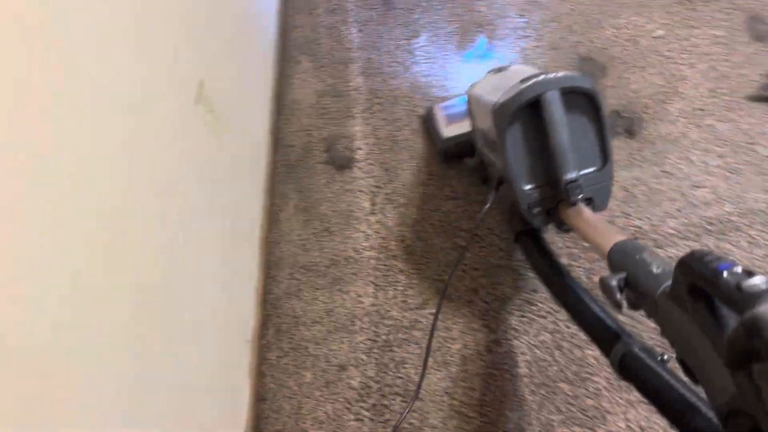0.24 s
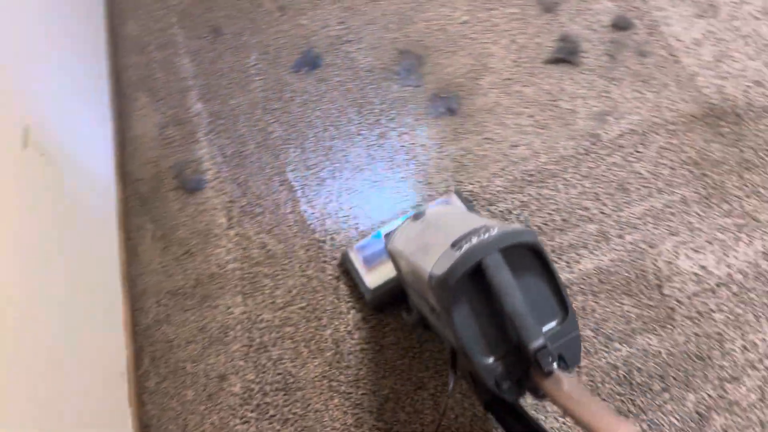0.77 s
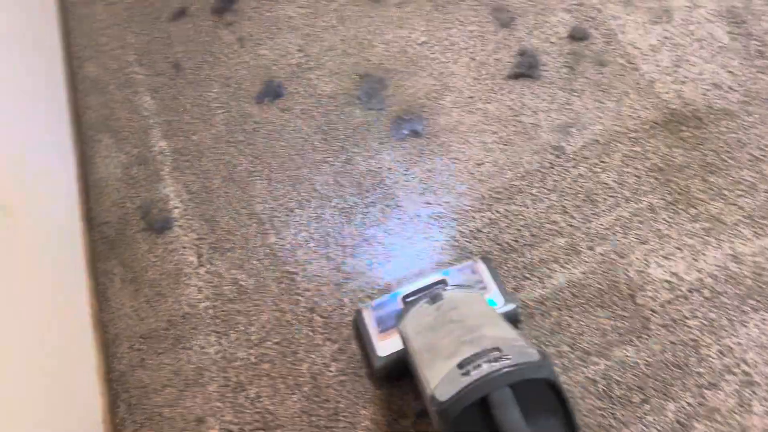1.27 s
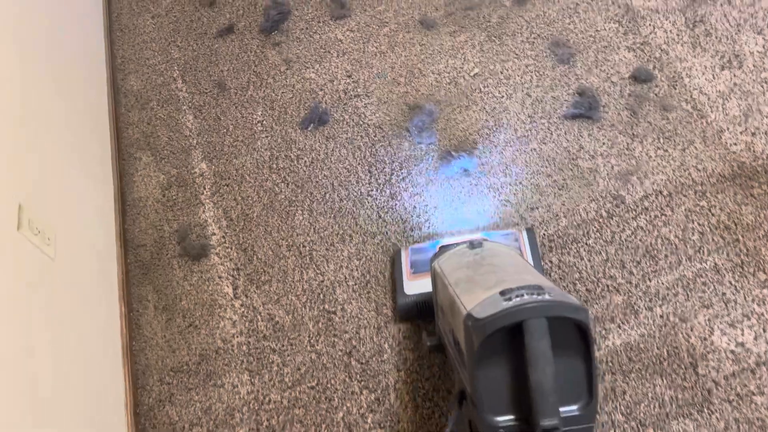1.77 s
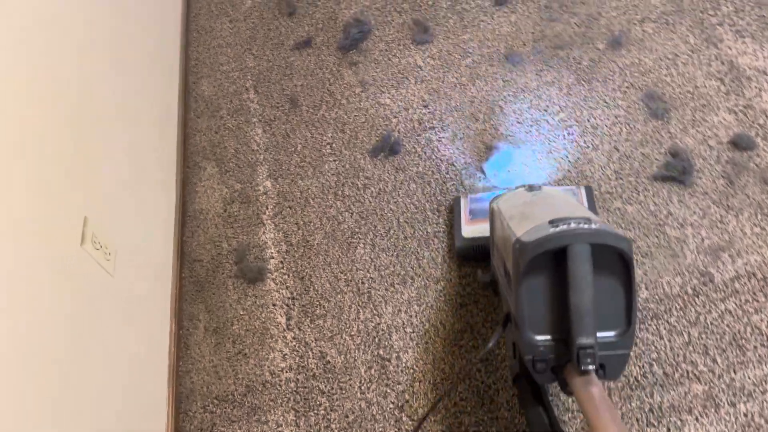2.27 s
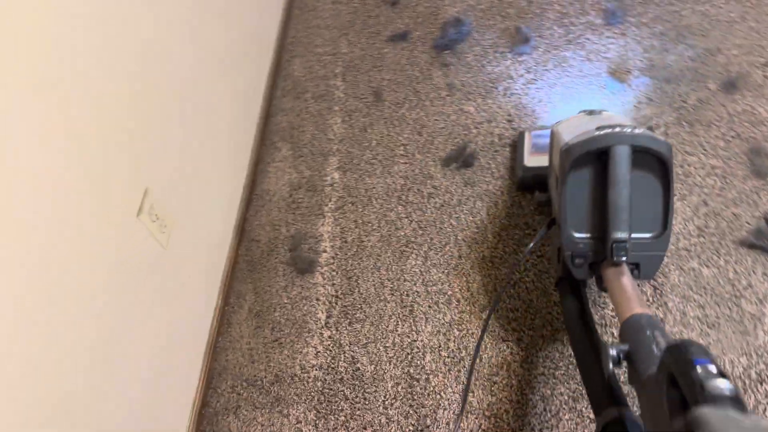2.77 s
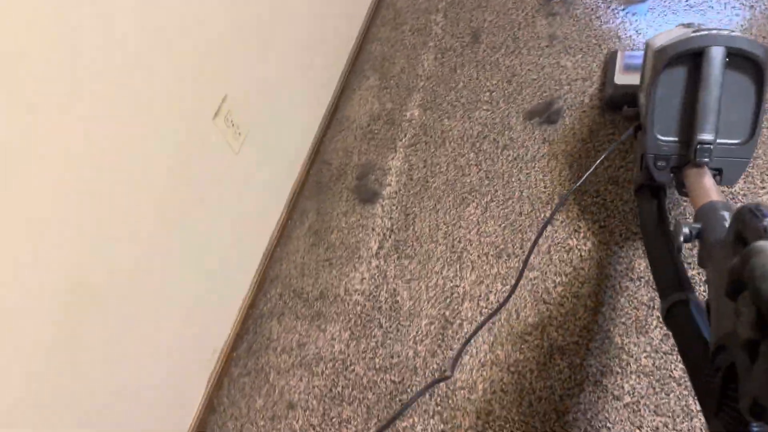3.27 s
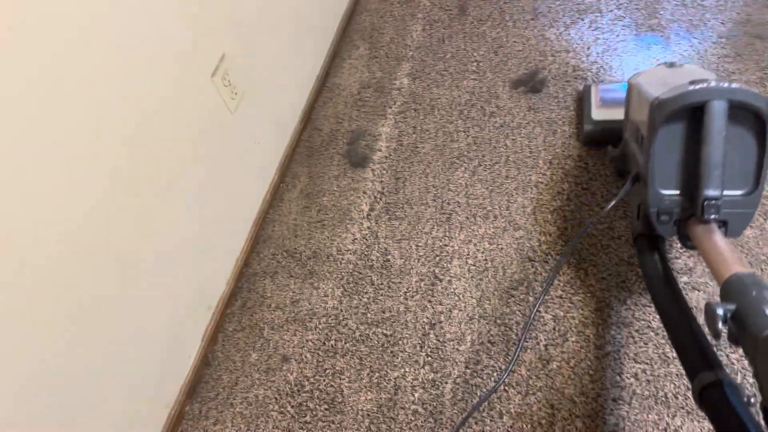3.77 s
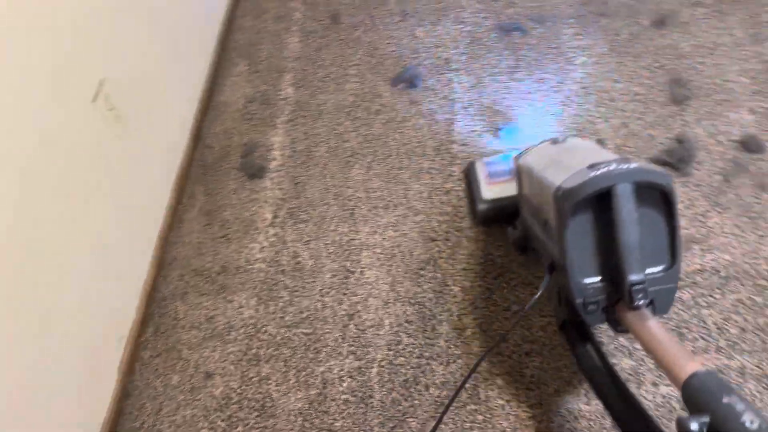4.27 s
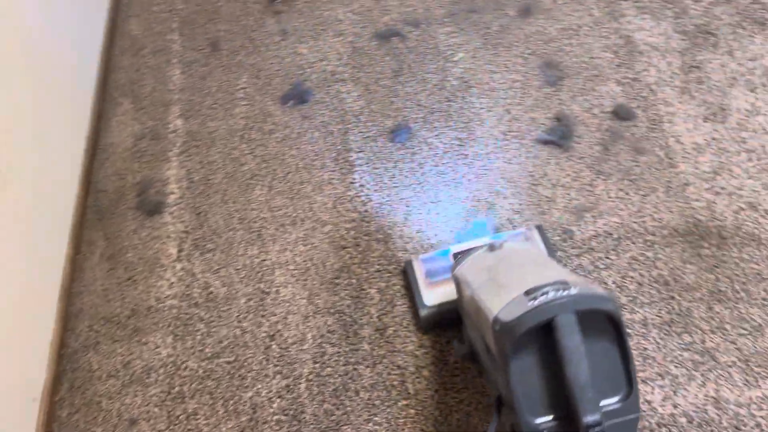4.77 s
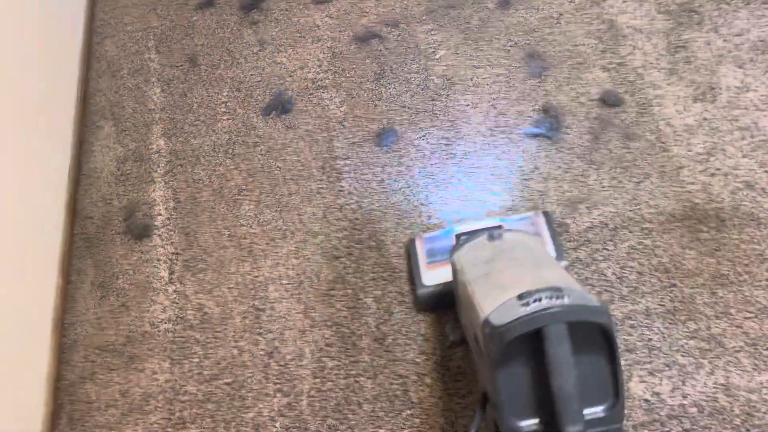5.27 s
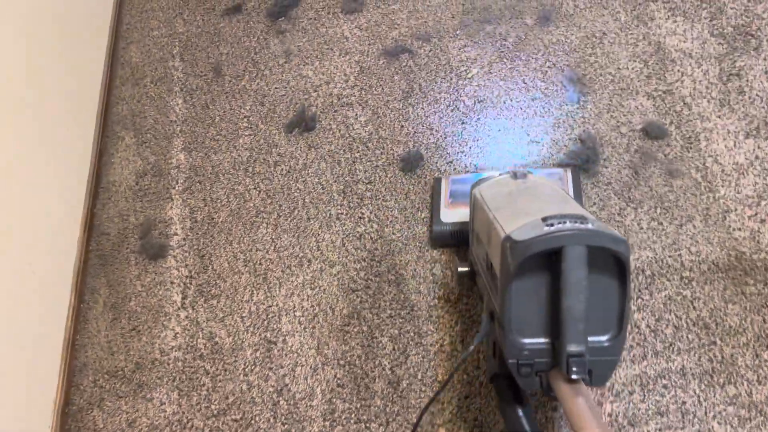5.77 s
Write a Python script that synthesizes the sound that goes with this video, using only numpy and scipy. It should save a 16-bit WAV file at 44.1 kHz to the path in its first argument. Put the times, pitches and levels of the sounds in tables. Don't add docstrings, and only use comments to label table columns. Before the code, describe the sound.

A vacuum cleaner is already running at full power on carpet in a small room, close to a handheld stereo microphone, and continues unbroken for six seconds. A nearly pure motor whine, around 660 hertz, stays fixed in pitch but wavers in loudness and position, often stronger on the right, with brief dips near 0.3 and 4.2 seconds. A thin, high blade tone glints above it. Hollow roaring air fills the middle; suction swells slightly around 1.1 seconds. From 2.4 the exhaust hiss brightens, peaking near 2.9, then recedes by 3.6 and stays duller through about 5.5. Underneath, the brush roll drums as a low buzzing hum, slowing slightly around 1.4 to 2.2 and after 5, with shudders near 1.2, 2, 4.4 and 5.1. Faint grit ticks patter throughout, with crisp ones near 0.7, 1.3, 3.8, 4.4 and 5.8. It ends still running.

```python
import sys
import numpy as np
from scipy import signal
from scipy.io import wavfile
from scipy.ndimage import uniform_filter1d

SR = 44100
rng = np.random.default_rng(int(sys.argv[2]) if len(sys.argv) > 2 else 0)


def convert_level_to_amplitude(level_db):
    exponent = np.asarray(level_db, float) / 20
    return 10 ** exponent


def generate_wav(sig):
    pcm = np.round(np.clip(np.atleast_2d(sig).T, -1, 1) * 32767).astype(np.int16)
    wavfile.write(sys.argv[1], SR, pcm)


N = 265923


def evened(x):
    return x / np.sqrt(np.mean(x ** 2) + 1e-20)


def read(points, hz):
    f, value = np.transpose(points)
    return np.interp(np.log(hz + 1), np.log(f + 1), value)


def columns(rows, t):
    s, *values = np.transpose(rows)
    return [np.interp(t, s, v) for v in values]


def wander(top_hz):
    coarse = rng.standard_normal(int(N / SR * 2 * top_hz) + 4)
    return evened(signal.resample(coarse, N))


def bumps(rows, t):
    return sum(db * np.exp(-((t - s) / width) ** 2) for s, width, db in rows)


# frequency in Hz, left lead in radians.
PORT_LEAD = [(600, 0.0), (1100, .9), (1600, 2.7), (2000, 1.1), (2250, .1), (2900, -.7), (5150, -.8),
             (5250, -4.4), (6700, -3.5), (7200, -3.14), (9400, 0.0), (12850, 3.14), (16200, 6.28)]


def lead(hz):
    rad = read(PORT_LEAD, hz)
    linger = np.interp(hz, [7500, 9000], [.05, .42])
    return rad - linger * np.sin(2 * rad)


def ports(x):
    hz = np.fft.rfftfreq(N, 1 / SR)
    right = np.fft.irfft(np.fft.rfft(x) * np.exp(-1j * lead(hz)), N)
    return np.array([x, right])


def hum(t):
    hum_hz, hum_db = 121.2, -59
    return np.sqrt(2) * convert_level_to_amplitude(hum_db) * np.cos(2 * np.pi * hum_hz * t)


# time in seconds, exhaust turned to the microphone in dB, nearness in dB.
POSE = [(0, -3, -4), (.2, -4, -0.5), (.9, -5.5, 0), (1.7, -5, 0), (2.15, -4, 1), (2.45, 4, 0),
        (2.85, 9, -.8), (3.2, 6, -2), (3.55, 1, -1.5), (4.2, -0.5, -1), (4.9, -3.5, 0.6), (5.5, -4, 0.8),
        (6.03, -1.5, 1.5)]
# frequency in Hz, level in dB.
AIR_COLOUR = [(30, -80), (95, -66.5), (155, -60.5), (230, -54), (350, -53.5), (480, -53), (1000, -56.5),
              (1900, -58), (2500, -67.5), (4100, -65.5), (5000, -68), (6300, -67), (7200, -68.5),
              (15800, -72)]
# frequency in Hz, width in Hz, rise in dB.
HOUSING_MODES = [(151, 20, 5), (345, 29, 11.5), (384, 15, 6), (945, 26, 4), (1082, 206, 4)]
# frequency in Hz, likeness from 0 to 1.
PORT_LIKENESS = [(70, .985), (130, .88), (550, .7), (800, .25), (1150, .38), (1400, .1), (1850, .5),
                 (2400, .95), (3000, .7), (4300, .6), (5200, .25), (6600, .55), (6850, .96), (8200, .999)]
# frequency in Hz, left minus right in dB.
PORT_BALANCE = [(60, 2), (200, -2.4), (1000, -1.5), (1500, 1), (1900, 2), (2300, 0.5), (3200, -1.3),
                (4600, -4.5), (6600, -4.5), (7000, 4), (16000, -3.5)]
# time in seconds, half width in seconds, rise in dB.
NOZZLE_LIFTS = [
    (1.1, 0.39, 1.6),
    (4.7, .4, 0.7),
]
# housing boom, roar, duct hiss, exhaust jet.
# Centre of each part in Hz.
PART_HZ = [350, 1300, 3800, 11000]
PART_FACING = [-0.0023, 0.0043, 0.24, 0.94]
PART_NEAR = [0.8, .99, 0.32, .01]
PART_REST_DB = [-1.72, 0.12, -0.16, 0.34]
PART_LIFT = [0.61, .2, .99, .01]


def air():
    level_db, hop = -29, 512
    frames, hz = N // hop + 5, np.fft.rfftfreq(2048, 1 / SR)
    t, hz_down = np.arange(frames) * hop / SR, hz[:, None]
    a, b, c, d, patches, ripple, sway = rng.standard_normal((frames, 1025, 7)).T

    patches = uniform_filter1d(patches, size=28, axis=0)
    patches = evened(uniform_filter1d(patches, size=15, axis=1))
    ripple = uniform_filter1d(ripple, size=2, axis=0)
    ripple = evened(uniform_filter1d(ripple, size=25, axis=1))
    ripple_db = 3.17 * ripple / (1 + (hz_down / 2600) ** 2) / (1 + (300 / (hz_down + 1)) ** 2)
    sputter = evened(uniform_filter1d(ripple[::-1, ::-1] * sway, size=150, axis=0))
    sputter_db = 1.6 * sputter * np.clip(hz_down / 12000, 0, 1)
    sway = evened(uniform_filter1d(sway, size=150, axis=0))
    sway_rad = np.interp(hz, [6000, 7600, 9000], [.1, .3, .18])[:, None] * sway

    facing_db, near_db = columns(POSE, t)
    parts_db = np.outer(facing_db, PART_FACING) + np.outer(near_db, PART_NEAR) + PART_REST_DB
    parts_db = parts_db + np.outer(bumps(NOZZLE_LIFTS, t), PART_LIFT)
    swell_db = np.array([read(list(zip(PART_HZ, row)), hz) for row in parts_db]).T
    modes_db = sum(db / (1 + (2 * (hz - f) / width) ** 2) for f, width, db in HOUSING_MODES)
    colour_db = (read(AIR_COLOUR, hz) + modes_db)[:, None]

    same = np.clip(read(PORT_LIKENESS, hz), 0, 1)[:, None]
    left = a + 1j * b
    right = same * left + np.sqrt(1 - same ** 2) * (c + 1j * d)
    right = right * np.exp(-1j * (lead(hz)[:, None] + sway_rad))
    lean = convert_level_to_amplitude(read(PORT_BALANCE, hz) / 2)[:, None]
    loudness = convert_level_to_amplitude(colour_db + swell_db + 0.73 * patches + ripple_db + sputter_db)
    spectra = np.array([left * lean, right / lean]) * loudness
    noise = signal.istft(spectra, nperseg=2048, noverlap=1536)[1][:, :N]
    return convert_level_to_amplitude(level_db) * evened(noise)


# time in seconds, peak level in dB.
CLEAR_GRIT = [(0.5484, -59), (0.5764, -40), (0.69, -29), (0.7946, -35), (1.275, -36), (3.7783, -34),
              (4.3864, -30), (4.7269, -62), (5.2054, -40), (5.7912, -33)]


def grit():
    ticks_per_s, faint_db = 40, -37
    spread_db = 3.0 * np.minimum(rng.exponential(1, N), 3)
    size = convert_level_to_amplitude(faint_db + spread_db) * (rng.random(N) < ticks_per_s / SR)
    for s, db in CLEAR_GRIT:
        size[round(s * SR)] = convert_level_to_amplitude(db + 9.5)
    bright = signal.firwin(41, 10500, pass_zero=False, fs=SR)
    fading_noise = rng.standard_normal(40) * np.exp(-np.arange(40) / 13.0)
    rattle = np.convolve(bright, fading_noise)
    return ports(signal.oaconvolve(size, rattle / abs(rattle).max())[:N])


# time in seconds, speed in Hz, thump in dB, bite of the bristle rows in dB.
BRUSH_ROLL = [(0, 75, -58, -38), (.3, 75.97, -58, -54), (.7, 75, -70, -64), (1.15, 75.8, -58, -67),
              (1.35, 71.1, -58, -40), (1.7, 70, -52.5, -40), (2.2, 70.8, -48, -41),
              (2.55, 74.53, -49.5, -40), (3.15, 73.24, -52, -38), (3.45, 72.15, -51.5, -48.5),
              (3.75, 70.6, -50.5, -44.5), (4.05, 71.4, -49.5, -46), (4.3, 73.7, -48, -50),
              (4.65, 74.8, -53.5, -51), (4.95, 74.5, -50.5, -66), (5.15, 71, -50, -36.5),
              (5.55, 70.03, -47.5, -37), (6.03, 71.3, -52, -36.5)]
# multiple of the roll speed, level in dB.
BRISTLE_BITE = [(3, -15), (4, -7), (5, -5.5), (6, -1.5), (8, -13.5)]
# time in seconds, half width in seconds, rise in dB.
ROLL_SHUDDERS = [(.3, 0.28, 11), (1.15, 0.22, 12), (1.95, 0.49, 8.5), (3.5, .2, 2.5), (4.35, 0.48, 9.5),
                 (5.1, .35, 10.5), (6.0, 0.19, 1)]


def brush(t):
    hz, thump_db, bite_db = columns(BRUSH_ROLL, t)
    twice_db = -58.5 + bumps(ROLL_SHUDDERS, t)
    speed_hz = uniform_filter1d(hz, size=4000) + 0.31 * wander(top_hz=5)
    turn = 2 * np.pi * np.cumsum(speed_hz) / SR
    thump, bite = np.zeros(N), np.zeros(N)
    for k, db in [(1, thump_db), (2, twice_db)]:
        thump += convert_level_to_amplitude(db + 1.9 * wander(top_hz=6)) * np.cos(k * turn)
    for k, db in BRISTLE_BITE:
        bite += convert_level_to_amplitude(db + bite_db + 2.06 * wander(top_hz=6)) * np.cos(k * turn + k * k)
    return np.sqrt(2) * (convert_level_to_amplitude([[.7], [-.7]]) * thump + convert_level_to_amplitude([[-1.2], [1.2]]) * bite)


# time in seconds, half width in seconds, change in dB.
BLADE_GLINTS = [(.2, .05, 4), (.42, .13, -7), (.7, .12, 2), (1.2, .2, 7), (1.77, .1, 6), (2.06, 0.068, -9),
                (2.3, .1, 4), (2.75, .07, 4), (3.0, .09, 6), (3.7, .1, 5), (4.08, .04, 8), (4.44, 0.088, 4),
                (4.56, .04, -7), (4.68, .06, 4), (4.96, .08, 8), (5.63, 0.059, 5), (5.77, .05, -8),
                (5.96, .08, 3)]


def blades(t):
    rest_db = -57.5
    glint_db = bumps(BLADE_GLINTS, t)
    facing_db = columns(POSE, t)[0]
    return [rest_db + glint_db, rest_db + .15 * glint_db + .55 * facing_db]


# time in seconds, speed in Hz, left level in dB, right level in dB, left lead in radians.
SHAFT_WHINE = [(0.0, 662.4, -36.3, -24.5, -0.29), (0.08, 662.6, -28.1, -23.9, -0.27),
               (0.26, 662.8, -22.6, -26.4, -1.33), (0.38, 662.7, -30.2, -21.7, -1.66),
               (0.54, 662.5, -23.5, -19.8, 0.13), (0.86, 663.1, -22.6, -23.7, 0.52),
               (1.17, 662.9, -23.9, -24.7, 0.41), (1.78, 662.9, -22.7, -22.5, 0.79),
               (2.22, 661.8, -28.2, -18.7, -0.23), (2.57, 662.7, -23.0, -22.1, 0.33),
               (2.7, 663.2, -25.3, -19.8, 0.34), (3.16, 662.9, -25.7, -21.6, -0.84),
               (3.57, 661.8, -29.3, -19.9, -0.6), (3.93, 661.7, -24.5, -25.3, -0.87),
               (4.3, 662.0, -25.6, -24.8, -1.72), (5.31, 662.3, -39.9, -20.5, -1.72),
               (5.8, 662.0, -32.3, -22.9, -6.2), (6.03, 662.1, -27.4, -23.1, -5.8)]
# time in seconds, half width in
# seconds, left change in dB, right change in dB.
WHINE_DIPS_AND_SWELLS = [(.33, .036, -5.5, -9.5), (2.33, .15, -1, -9.2), (4.185, .11, -12.5, -13),
                         (4.44, .12, -1.5, -2.8), (4.72, .14, 1, 1.6), (5.48, .12, -6, 0), (5.7, .14, -14, 0)]
# multiple of shaft speed, left in dB, right in dB, flutter in dB.
SHAFT_OVERTONES = [(2, -64, -60, 9), (4.397, -81, -71, 11)]
BLADE_TONES = [
    (8, -1.2, 6.1, 2.7),
    (16, .5, .5, 1.1),
]


def motor(t):
    hz, left_db, right_db, ahead = columns(SHAFT_WHINE, t)
    turn = 2 * np.pi * np.cumsum(hz + .1 * wander(top_hz=12)) / SR
    whine = np.array([convert_level_to_amplitude(left_db) * np.cos(turn + ahead), convert_level_to_amplitude(right_db) * np.cos(turn)])
    for s, width, *change_db in WHINE_DIPS_AND_SWELLS:
        lost = 1 - convert_level_to_amplitude(np.array(change_db)[:, None]) ** 2
        whine = whine * np.sqrt(1 - lost / (1 + ((t - s) / width) ** 2))
    out = np.sqrt(2) * whine * convert_level_to_amplitude(2.5 + 0.17 * wander(top_hz=43.0))

    tones = [*SHAFT_OVERTONES, *BLADE_TONES]
    for (k, left_db, right_db, flutter_db), level_db in zip(tones, [0, 0] + blades(t)):
        tone = convert_level_to_amplitude(flutter_db * wander(top_hz=18)) * np.cos(k * turn + 1.5 * wander(top_hz=9))
        other = convert_level_to_amplitude(flutter_db * wander(top_hz=15)) * np.cos(k * turn + 1.2 + .5 * wander(top_hz=3))
        pair = ports(evened(tone)) if k > 10 else np.array([evened(tone), evened(other)])
        out += convert_level_to_amplitude(np.array([[left_db], [right_db]]) + level_db) * pair
    return out


def scene():
    t = np.arange(N) / SR
    return hum(t) + air() + grit() + brush(t) + motor(t)


def top_cut(x):
    return signal.sosfilt(signal.butter(12, 16210, fs=SR, output="sos"), x)


def record(dry):
    low_pass = signal.firwin(1023, 15730, window=("kaiser", 9), fs=SR)
    mix = signal.oaconvolve(dry, low_pass[None], "same")
    return top_cut(mix)


dry = scene()
out = record(dry)
generate_wav(out)
```